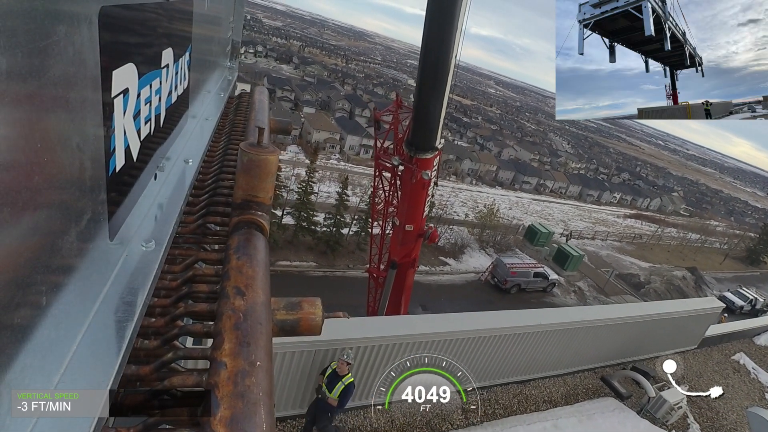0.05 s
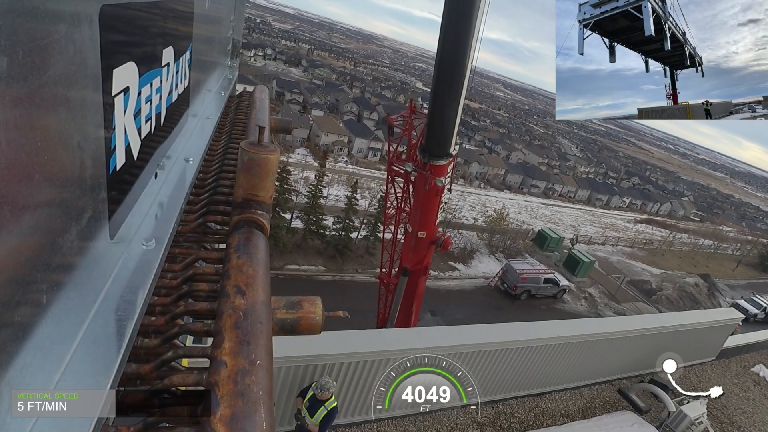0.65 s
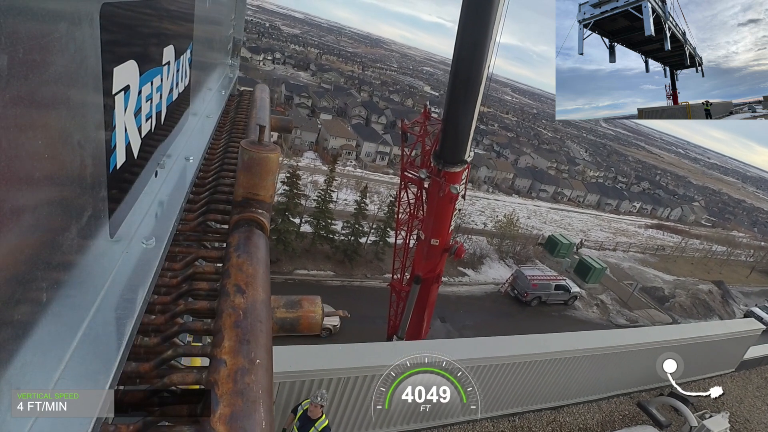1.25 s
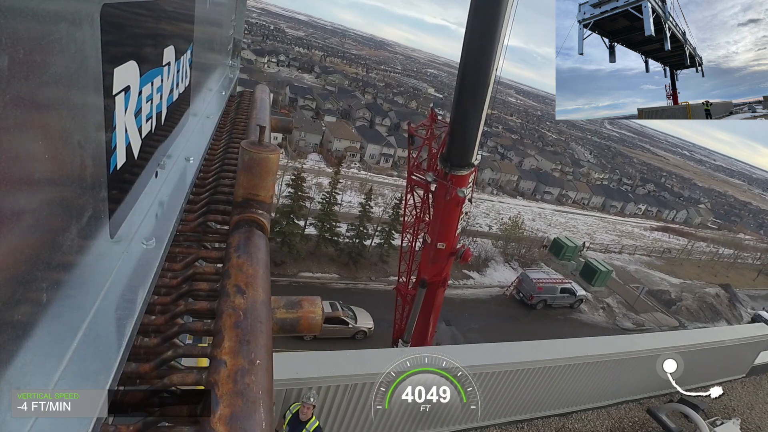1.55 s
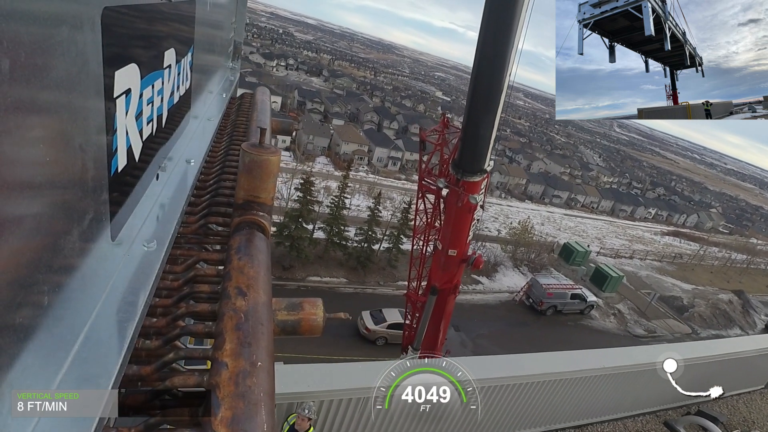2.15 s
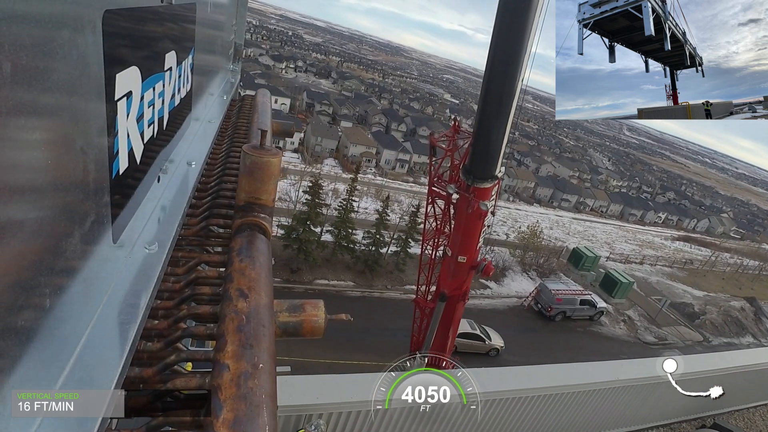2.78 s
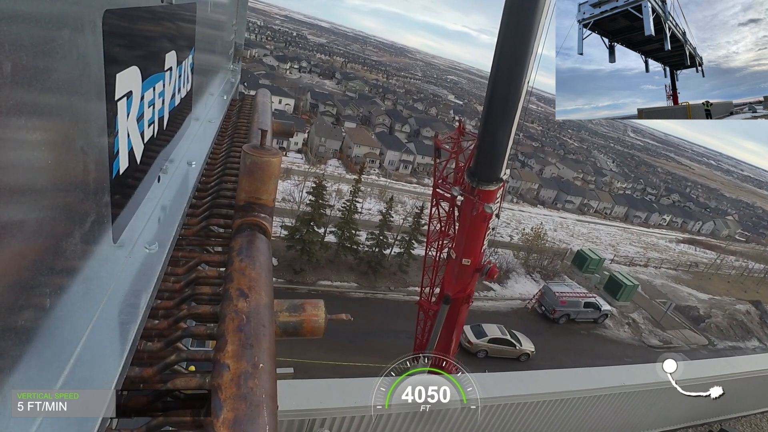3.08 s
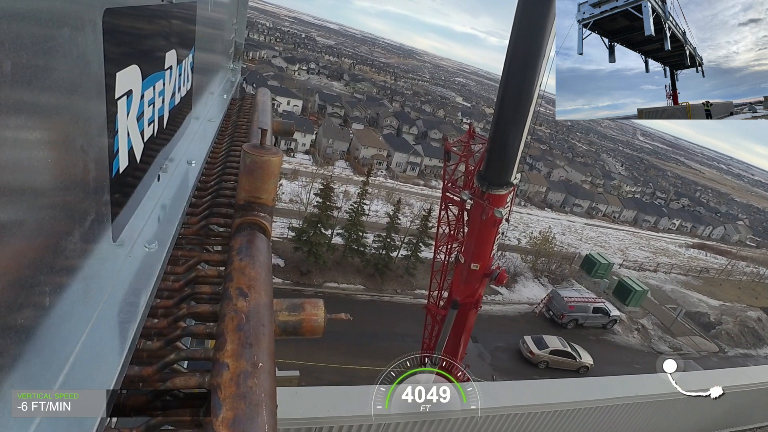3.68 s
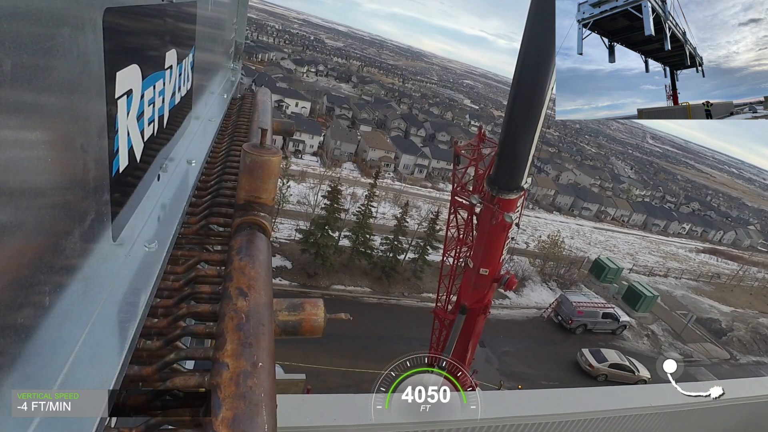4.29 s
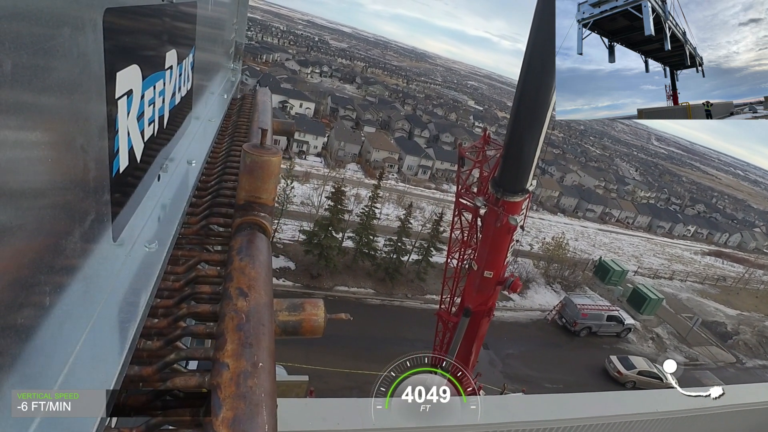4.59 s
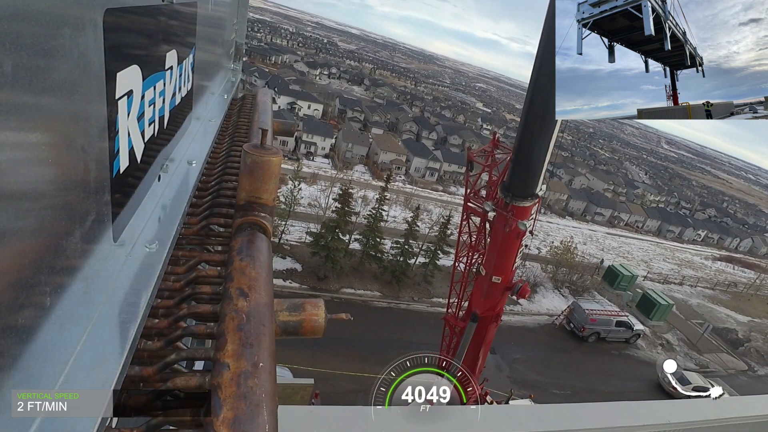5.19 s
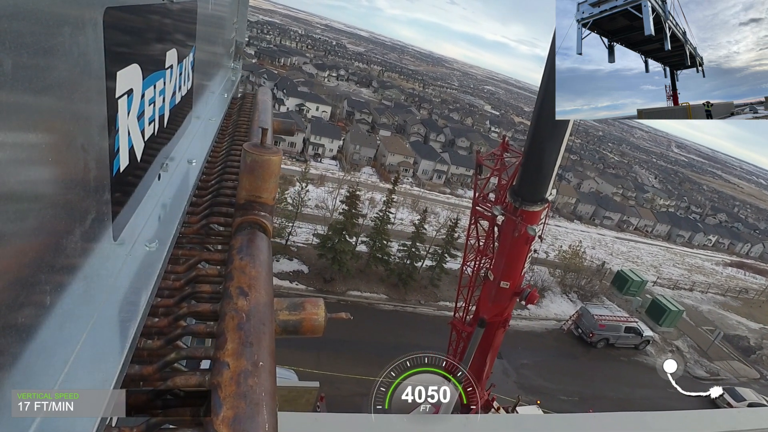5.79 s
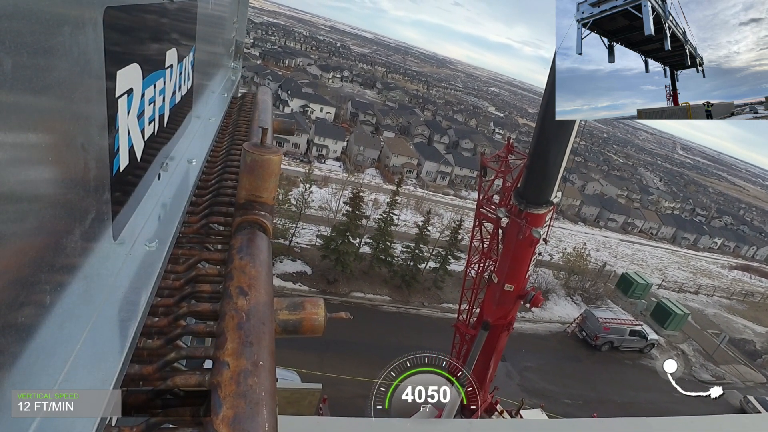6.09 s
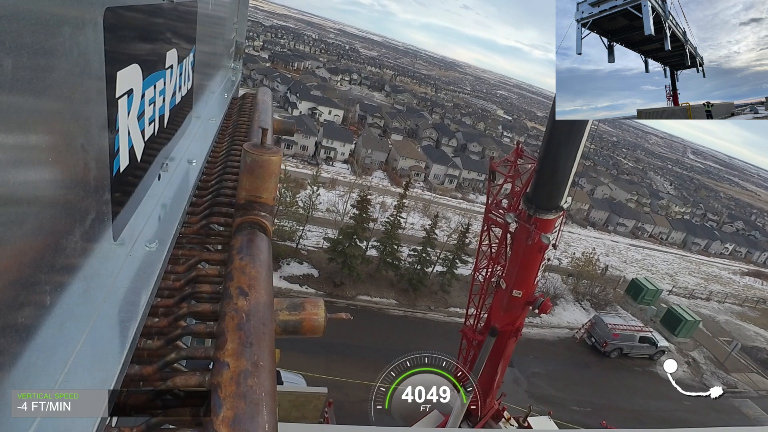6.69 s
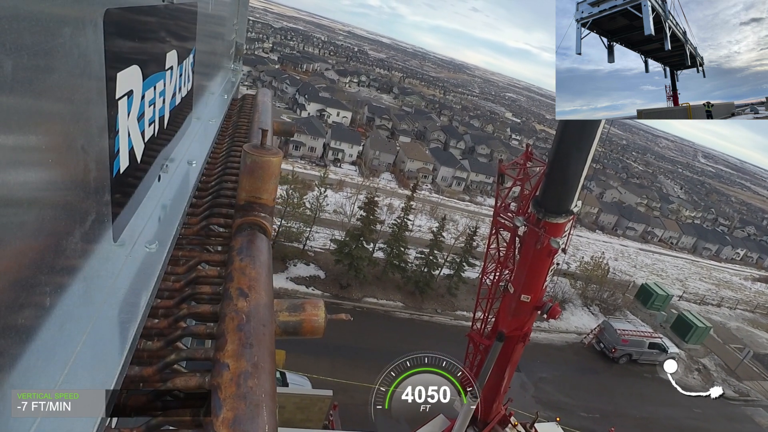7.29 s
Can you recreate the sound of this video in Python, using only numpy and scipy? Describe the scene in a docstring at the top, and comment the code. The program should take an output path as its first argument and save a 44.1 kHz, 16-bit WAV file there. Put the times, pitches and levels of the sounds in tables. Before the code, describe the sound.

A crane's diesel engine drones steadily outdoors with faint whines, while a car passes and something ticks and scuffs near the microphone.

```python
"""A deep, steady diesel drone comes first: a mobile crane in the street, heard from a roof.
Its exhaust throbs under a broad rumble; fan and hydraulics add a rush, faint whines and a growing
valve hiss. Near the end the engine starts to lope, its cylinders firing unevenly.
A car passes below with a faint hiss of tyres. Close by, gear scuffs and ticks against a small
camera housing, which rings near 3.4 kHz."""
import sys
import numpy as np
from scipy import signal
from scipy.io import wavfile

SR = 44100
rng = np.random.default_rng(int(sys.argv[2]) if len(sys.argv) > 2 else 0)


def transcribe(signal):
    """Save signal, clipped to [-1, 1], as a 16-bit WAV file at the path in sys.argv[1]."""
    frames = np.atleast_2d(signal).T
    limited = np.clip(frames, -1, 1)
    pcm = np.round(limited * 32767).astype(np.int16)
    wavfile.write(sys.argv[1], SR, pcm)


N = 328545
TIME_S = np.arange(N) / SR


def from_db(db):
    """Turn decibels into a number to multiply by."""
    return 10 ** (np.asarray(db) / 20)


def rms_one(x):
    """Scale a sound to an average strength (rms) of 1."""
    return x / np.sqrt(np.mean(x ** 2) + 1e-20)


def in_time(rows):
    """Join (time, value) points with straight lines, giving one value per sample."""
    return np.interp(TIME_S, *np.transpose(rows))


def ramp(start_s, length_s):
    """Rise from 0 to 1 and stay there."""
    return np.clip((TIME_S - start_s) / length_s, 0, 1)


def phase_of(hz):
    """How far a vibration has turned, in radians, from a random start."""
    return 2 * np.pi * (np.cumsum(hz) / SR + rng.random())


def drift(rate_hz):
    """A smooth random wander, typically about 1 in size."""
    step, warm_up = 40, 2000   # one random value every 40 samples
    pole = np.exp(-2 * np.pi * step * rate_hz / SR)
    noise = rng.standard_normal(N // step + warm_up + 2)
    slow = signal.lfilter([1], [1, -2 * pole, pole * pole], noise)[warm_up:]
    return np.interp(np.arange(N) / step, np.arange(len(slow)), rms_one(slow))


def band_pass(x, edges_hz, order=2):
    """Keep the part of a sound between two pitches."""
    return signal.sosfilt(signal.butter(order, edges_hz, "band", fs=SR, output="sos"), x)


def resonate(x, modes):
    """Ring each mode (a pitch an object likes to ring at) and add them with alternating signs."""
    out = 0
    for k, (hz, width_hz, db) in enumerate(modes):
        r = np.exp(-np.pi * width_hz / SR)
        poles = [1, -2 * r * np.cos(2 * np.pi * hz / SR), r * r]
        out = out + (-1) ** k * from_db(db) * (1 - r * r) / 2 * signal.lfilter([1, 0, -1], poles, x)
    return out


def resonate_steeply(x, modes):
    """Ring each mode twice over, so the pitches between them stay quiet."""
    return sum(resonate(resonate(x, [(hz, width, db)]), [(hz, width, 0)]) for hz, width, db in modes)


def ringing_noise(modes):
    """Each mode is kept ringing by a noise of its own."""
    return rms_one(sum(resonate_steeply(rng.standard_normal(N), [mode]) for mode in modes))


def banded_noise(spectrum, flicker_db):
    """Noise in bands a third of an octave wide, each flickering by itself."""
    hz, db = np.transpose(spectrum)
    white, out = rng.standard_normal((2, N + SR // 2)), 0
    for k, centre_hz in enumerate(1000 * 2 ** (np.arange(-18, 12) / 3)):
        flicker = flicker_db * drift(13)
        if hz[0] / 2 ** .5 < centre_hz < hz[-1] * 2 ** .5:
            band = band_pass(white[k % 2], centre_hz * 2 ** (np.array([-1, 1]) / 6))[-N:]
            band_db = np.interp(np.log(centre_hz), np.log(hz), db)
            out = out + band * from_db(band_db + flicker)
    return rms_one(out)


def wavering_tone(hz, width_hz):
    """A tone that fades and wanders, as it does on its way through moving air."""
    phase = phase_of(np.full(N, hz))
    return rms_one((0.79 + drift(width_hz)) * np.cos(phase) + drift(width_hz) * np.sin(phase))


def street_rush(start_db, db_per_s):
    """A hollow rush from the street, fading away."""
    rush = rms_one(band_pass(rng.standard_normal(N), edges_hz=[362, 489]))
    return from_db(start_db + db_per_s * TIME_S) * rush


# Tyre hiss from low to high: pitch_hz, relative_db
TYRE_SPECTRUM = [(1300, -1), (2000, 2), (2500, 0.5), (3100, -13), (4000, -26.5)]

def passing_car(peak_db, nearest_s, fade_s):
    """Tyre hiss swells as the car comes closer and is 3 dB down fade_s after it passes."""
    distance = np.hypot(1, (TIME_S - nearest_s) / fade_s)
    return from_db(peak_db) / distance * banded_noise(TYRE_SPECTRUM, flicker_db=-0.2)


# Outdoor hiss: pitch_hz, relative_db
AIR_SPECTRUM = [(1500, -4.5), (2200, 4.5), (2700, -8.5), (3300, 0.5), (4200, -12.5), (5000, -33.5),
                (6300, -37), (8000, -20.5), (10000, -29.5), (12500, -34), (13500, -35.5)]
# The ring of the housing: pitch_hz, width_hz, relative_db
HOUSING_MODES = [(3313, 520, 7), (6760, 930, -12), (7220, 1000, -14)]

def housing_hiss(air_db, ring_db):
    """An even outdoor hiss, and the ring it draws from the camera housing."""
    air = banded_noise(AIR_SPECTRUM, flicker_db=0.5)
    return from_db(air_db) * air + from_db(ring_db) * ringing_noise(HOUSING_MODES)


ATTACK_SHARE = 0.13   # the part of a touch spent pressing harder

def touch_pressure(length_s, fall_db):
    """The pressure of one touch builds, eases off and lets go."""
    progress = np.linspace(0, 1, max(int(length_s * SR), 20))
    build = np.minimum(progress / ATTACK_SHARE, 1)
    ease = from_db(-fall_db * np.maximum(progress - ATTACK_SHARE, 0))
    let_go = np.minimum(5 * (1 - progress), 1)
    return build * ease * let_go


# Four sounds of the touched housing, each with: pitch_hz, width_hz, relative_db
RUB_RING_MODES = [(3355, 680, 0)]
BODY_CLACK_MODES = [(2000, 290, -6), (2390, 140, -3), (2690, 290, 1), (3110, 270, 3)]
BRIGHT_SCRATCH_MODES = [(3830, 540, 8.5), (6900, 690, -0.5), (8900, 1850, -13)]
FINE_RUSTLE_MODES = [(10800, 4700, 0)]
# Gear knocking: start_s, ring_db, body_over_ring_db, scratch_over_ring_db, pitch_hz, length_s
GEAR_TICKS = [(0.376, -35.5, -2, -16, 3700, .008), (0.389, -30, -2, -6, 3420, 0.0045),
              (0.397, -36, -1, -9, 3400, .008), (0.411, -39, -4, -2, 3400, 0.005),
              (.417, -36, -7, -7, 3300, .009), (0.482, -37, -5, -22, 3460, 0.0085),
              (.533, -35, -6, -22, 3440, .006), (.59, -49, 0, -1, 3400, .016),
              (.709, -52, -4, 8, 3480, .009), (0.817, -55, -3, 3, 3400, .011),
              (1.406, -40, -7, -18, 3330, 0.0075), (1.417, -36.5, -4, -18, 3370, 0.01),
              (1.435, -44, 0, -19, 3420, 0.016), (1.462, -43, -7, -15, 3450, .01),
              (1.606, -36, -3, -10, 3470, .012), (1.625, -32, -2, -12, 3460, .008),
              (1.628, -39, -2, -12, 3470, 0.0078), (1.645, -50, -4, -4, 3400, .01),
              (1.657, -47, -10, -18, 3400, .009), (1.68, -31, -0.5, -13, 3480, 0.0066),
              (1.685, -45, -1, -14, 3350, .02), (1.716, -43.5, 3, -4, 3480, 0.02),
              (1.738, -44, -6, -10, 3450, .009), (1.783, -49, -4, -7, 3400, .012),
              (1.878, -38, -14, -26, 3440, 0.0081), (1.915, -48, -2, -11, 3400, .007),
              (2.78, -56, -6, 0, 3400, .008), (4.472, -26, -5, -19, 3330, 0.0052),
              (4.476, -25.5, -7, -14, 3390, 0.0047), (4.481, -24, -2.5, -14, 3230, 0.0067),
              (4.486, -34, -7, -17, 3260, 0.008), (4.497, -44, -1, -3, 3300, .012),
              (4.918, -35, -8, -28, 3330, 0.013)]
# Gear sliding: start_s, ring_db, body_over_ring_db, scratch_over_ring_db, rustle_db, length_s
GEAR_RUBS = [(-.005, -44, 1, -7.5, -84, 0.034), (0.381, -39, 0.5, -5, -64, 0.052),
             (0.419, -42.5, -1, -11, -72, .056), (0.48, -54.5, 2.5, -6, -72.5, .26),
             (1.368, -50, 0, -16, -90, 0.22), (1.585, -52.5, -1, -7, -87, .15),
             (1.816, -40, -5, -14, -77.5, 0.069), (4.135, -47, 0, -20, -82, 0.073),
             (4.205, -64, -3, -5, -76.5, .06), (4.469, -46, -5, -8, -71, 0.028)]

def scuffs(gain_db, rustle_gain_db, impact_db, slips_per_s):
    """Gear sticks and slips on the housing, ringing it; firm touches clack, sharp ones scratch."""
    out, tail = np.zeros(N), SR // 20
    slips = rng.standard_normal(N) * (0.45 + (rng.random(N) < slips_per_s / SR))
    for start_s, *_, length_s in GEAR_TICKS:   # each knock lands with one hard impact
        slips[int((start_s + ATTACK_SHARE * length_s) * SR)] += from_db(impact_db)
    cushioned = band_pass(slips, edges_hz=[1490, 9400], order=4)

    def add(start_s, pressure, force, modes, level_db, through=resonate):
        """Each touch lands on another spot, so its modes shift a little in pitch and strength."""
        at, n = max(int(start_s * SR), 0), len(pressure)
        spot = [(hz * (1 + rng.normal(0, 0.021)), width, db + rng.normal(0, 1.1))
                for hz, width, db in modes]
        sound = through(np.pad(force[at:at + n] * pressure, (0, tail)), spot)
        sound *= np.sqrt(np.sum(pressure ** 2) / np.sum(sound ** 2))   # energy follows the pressure
        out[at:at + n + tail] += from_db(level_db) * sound

    def touch(start_s, pressure, ring_modes, level_db, body_db, scratch_db):
        """The ring, clack and scratch of one touch."""
        add(start_s, pressure, cushioned, ring_modes, level_db, through=resonate_steeply)
        add(start_s, pressure, cushioned, BODY_CLACK_MODES, level_db + body_db)
        add(start_s, pressure, cushioned, BRIGHT_SCRATCH_MODES, level_db + scratch_db)

    for start_s, ring_db, body_db, scratch_db, pitch_hz, length_s in GEAR_TICKS:
        pressure = touch_pressure(length_s, fall_db=17.5)
        ring_modes = [(pitch_hz, 390, 0)]   # one ring, 390 Hz wide
        touch(start_s, pressure, ring_modes, ring_db + gain_db, body_db, scratch_db)
    for start_s, ring_db, body_db, scratch_db, rustle_db, length_s in GEAR_RUBS:
        pressure = touch_pressure(length_s, fall_db=5.5)
        touch(start_s, pressure, RUB_RING_MODES, ring_db + gain_db, body_db, scratch_db)
        add(start_s, pressure, slips, FINE_RUSTLE_MODES, rustle_db + rustle_gain_db)
    return out


# Oil in the lowering valve, both with: pitch_hz, width_hz, relative_db
OIL_WHISTLE_MODES = [(3220, 110, -4.5), (3409, 137, -0.5), (3520, 110, -5.5)]
OIL_HISS_MODES = [(3653, 340, -3), (3837, 160, 0)]

def valve(whistle_db, whistle_db_per_s, open_db, shut_db):
    """Squeezed oil hisses as the valve opens, and a whistle grows as the load comes down."""
    opening = ramp(start_s=1.2, length_s=2)
    whistle = from_db(whistle_db + whistle_db_per_s * TIME_S) * ringing_noise(OIL_WHISTLE_MODES)
    hiss = from_db(shut_db + (open_db - shut_db) * opening) * ringing_noise(OIL_HISS_MODES)
    return whistle + hiss


def pump_whine(firing_hz, swell_db, start_db, db_per_s):
    """The pump is geared to the engine, so its whine follows the engine's speed."""
    pitch_hz = 1348 * firing_hz / firing_hz.mean() + 1.7 * drift(7.85)
    level_db = start_db + db_per_s * TIME_S + swell_db + 0.5 * drift(4.6)
    return from_db(level_db) * np.sqrt(2) * np.sin(phase_of(pitch_hz))


def gear_whine(start_db, db_per_s):
    """Turning gears give a thin, wavering whine that slowly fades."""
    level_db = start_db + db_per_s * TIME_S + 0.5 * drift(0.84)
    return from_db(level_db) * wavering_tone(hz=2221, width_hz=21)


# Air churned by the fan blades: pitch_hz, width_hz, relative_db
CHURN_MODES = [(799, 147, 0), (906, 150, -1.5)]

def fan_whine(swell_db, level_db, churn_over_tone_db):
    """The blades whine and churn the air, starting loud and then settling."""
    blades = wavering_tone(hz=867, width_hz=8.7)
    blades += from_db(churn_over_tone_db) * ringing_noise(CHURN_MODES)
    early_db = 6 * np.exp(-(TIME_S / 2.3) ** 2)
    return from_db(level_db + swell_db + early_db) * blades


# Moments when moving air lets the whines swell: peak_s, pump_boost_db, fan_boost_db
WHINE_SWELLS = [(.55, 1, 1.5), (1.6, 11, 3), (2.58, 12, 0.5), (3.1, 9.5, 2.5), (4.2, 2, 5.5), (4.5, -2, 7),
                (6.5, 6, -3), (7.25, 6, 3.5)]
# Steady tones of pumps, fan and gears: pitch_hz, level_db, width_hz
MACHINE_TONES = [(40.2, -47, .5), (80.5, -44, 1), (120, -51, 1), (181, -53, 1.5), (261, -51, 1.5),
                 (296, -53, 3), (327, -51, 3), (362, -58, 3), (378, -55, 2), (421, -53.5, 3),
                 (1132, -64, 6), (1640, -68, 6), (1725, -69, 6), (1777, -67, 5), (1820, -69, 6),
                 (2000, -65, 6), (2130, -69, 7), (2590, -75, 6)]

def machinery(firing_hz):
    """Pump, gears and fan sing above the engine, heard through moving air."""
    pump_swell_db, fan_swell_db = sum(np.outer(boosts_db, np.exp(-((TIME_S - peak_s) / 0.19) ** 2))
                                      for peak_s, *boosts_db in WHINE_SWELLS)
    whines = pump_whine(firing_hz, pump_swell_db, start_db=-67, db_per_s=1.29)
    whines += gear_whine(start_db=-60, db_per_s=-0.4)
    whines += fan_whine(fan_swell_db, level_db=-56.5, churn_over_tone_db=3)
    return whines + sum(from_db(db) * wavering_tone(hz, width) for hz, db, width in MACHINE_TONES)


# Air rushing through the cooling fan: pitch_hz, relative_db
FAN_SPECTRUM = [(350, -14.5), (560, -1.5), (700, -3), (830, 6), (1000, 2), (1180, -3), (1500, -26.5),
                (2200, -20)]

def fan_rush(effort_db, level_db):
    """The cooling fan rushes evenly, a little quieter when the engine works harder."""
    return from_db(level_db - 0.3 * effort_db) * banded_noise(FAN_SPECTRUM, flicker_db=-0.94)


# Exhaust rumble and diesel clatter, both with: pitch_hz, relative_db
RUMBLE_SPECTRUM = [(14, -23), (24, -7), (34, -10.5), (48, 1), (62, 0.5), (95, 0.5), (130, -3), (190, -4.5),
                   (255, -4.5), (340, -12.5), (470, -17.5), (620, -18.5), (900, -31.5)]
CLATTER_SPECTRUM = [(800, -12.5), (1100, 8.5), (1450, 4.5), (1850, -1.5), (2100, 4.5), (2450, -7.5)]

def rumble_and_clatter(firing_phase, effort_db, rumble_db, clatter_db, clatter_db_per_s):
    """The engine's noise grows with effort and swells each time a cylinder fires."""
    pulse = rms_one(1 + 0.098 * np.cos(firing_phase) * (1 + .5 * drift(6.1)))
    rumble = from_db(rumble_db + 0.69 * effort_db) * banded_noise(RUMBLE_SPECTRUM, flicker_db=-0.1)
    treble_cut = signal.butter(10, 2320, fs=SR, output="sos")
    clatter = signal.sosfilt(treble_cut, banded_noise(CLATTER_SPECTRUM, flicker_db=0.74))
    clatter *= from_db(clatter_db + 0.71 * effort_db + clatter_db_per_s * TIME_S)
    return pulse * (rumble + clatter)


# Drone tones at 1, 2, 3 ... times the firing rate: relative_db
DRONE_LEVELS_DB = [0, -23.5, -18.5, -31.5, -25]
# Lope tones at 0.5, 1.5, 2.5 ... times the firing rate: relative_db
LOPE_LEVELS_DB = [2, -15, -21, -22, -24, -10.5]
# The boom of the silencer: pitch_hz, width_hz, relative_db
SILENCER_MODES = [(41, 19, 0)]

def exhaust(firing_phase, effort_db, drone_db, lope_db, boom_db):
    """The firings make a throbbing drone, the silencer booms, and uneven firing adds a late lope."""
    def tones(levels_db, first_multiple):
        """A stack of tones that follow the firing rate."""
        return np.sqrt(2) * sum(from_db(db) * np.sin(multiple * firing_phase + 2 * np.pi * rng.random())
                                for multiple, db in zip(first_multiple + np.arange(len(levels_db)),
                                                        levels_db))

    drone = from_db(drone_db + 0.49 * effort_db) * tones(DRONE_LEVELS_DB, 1)
    lope = from_db(lope_db) * ramp(start_s=6.74, length_s=0.73) * tones(LOPE_LEVELS_DB, 0.5)
    throb = 1 + 0.06 * wavering_tone(hz=5.8, width_hz=2)
    boom = from_db(boom_db + 2.3 * effort_db) * ringing_noise(SILENCER_MODES)
    return throb * drone + lope + boom


# How often the cylinders fire: time_s, firing_hz
ENGINE_SPEED = [(0, 47.22), (.7, 47.23), (1.1, 47.34), (3.6, 47.27), (4.6, 47.2), (6.4, 47.26),
                (7.45, 47.05)]
# How much harder than usual the engine works: time_s, effort_db
ENGINE_EFFORT = [(0, -3.5), (1.2, -2.1), (3.2, 0.8), (4.3, 0.75), (6.6, 0.2), (7.3, 2)]

def scene():
    """The crane and street below and the small noises at the camera, in mono."""
    firing_hz, effort_db = in_time(ENGINE_SPEED), in_time(ENGINE_EFFORT)
    firing_phase = phase_of(firing_hz)
    crane = exhaust(firing_phase, effort_db, drone_db=-30.5, lope_db=-31, boom_db=-43.2)
    crane += rumble_and_clatter(firing_phase, effort_db, rumble_db=-33.5,
                                clatter_db=-50, clatter_db_per_s=0.4947)
    crane += fan_rush(effort_db, level_db=-43.5)
    crane += machinery(firing_hz)
    crane += valve(whistle_db=-65.5, whistle_db_per_s=1.67, open_db=-63, shut_db=-71.5)
    street = street_rush(start_db=-46, db_per_s=-1)
    street += passing_car(peak_db=-56, nearest_s=2, fade_s=1.26)
    near = housing_hiss(air_db=-59, ring_db=-61)
    near += scuffs(gain_db=-3.5, rustle_gain_db=-8, impact_db=13, slips_per_s=3000)
    return (crane + street + near)[None]


def record(dry):
    """The level dips briefly near the end, and the highest treble is cut."""
    dip_s, dip_length_s, cutoff_hz = 7.3905, .013, 13300
    dip_db = -18 * np.exp(-(2 * (TIME_S - dip_s) / dip_length_s) ** 6)
    treble_cut = signal.ellip(10, .1, 80, cutoff_hz, fs=SR, output="sos")
    return signal.sosfilt(treble_cut, dry * from_db(dip_db))


dry = scene()
out = record(dry)
transcribe(out)
```